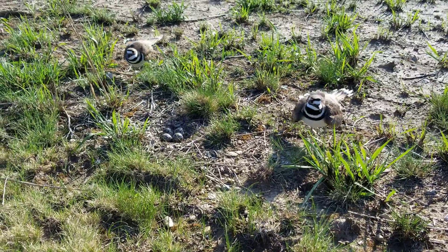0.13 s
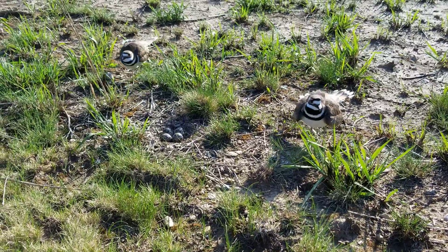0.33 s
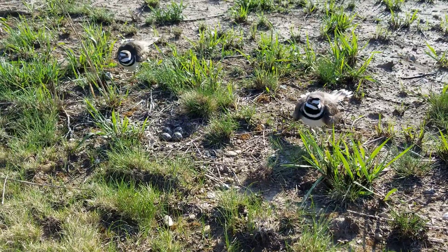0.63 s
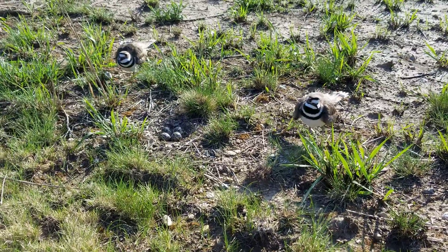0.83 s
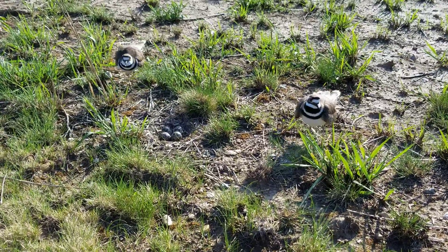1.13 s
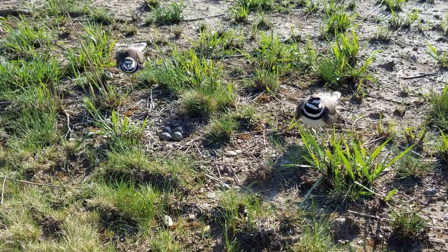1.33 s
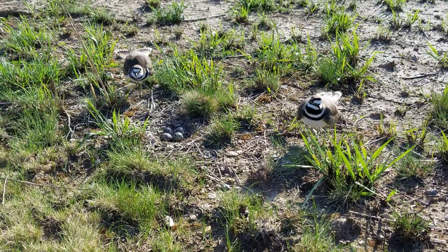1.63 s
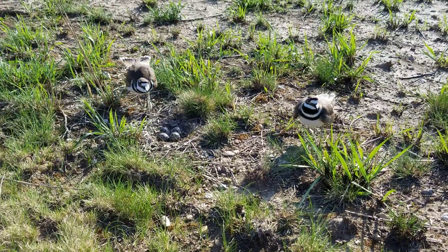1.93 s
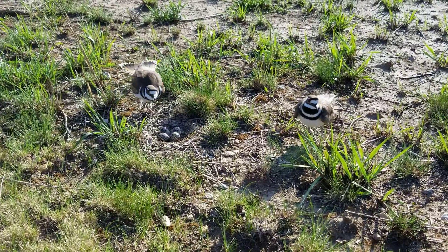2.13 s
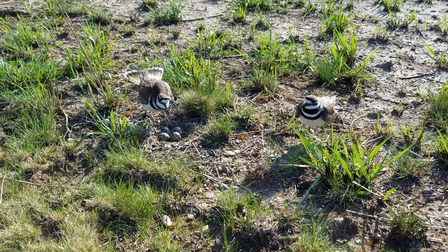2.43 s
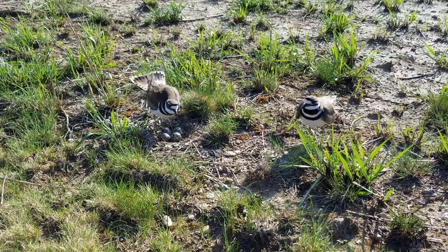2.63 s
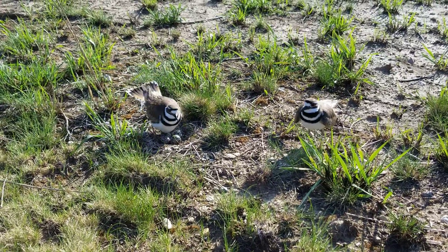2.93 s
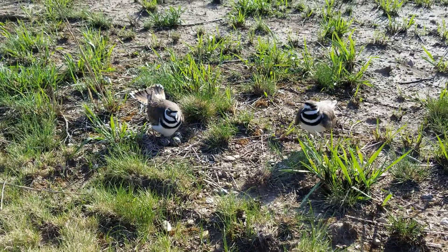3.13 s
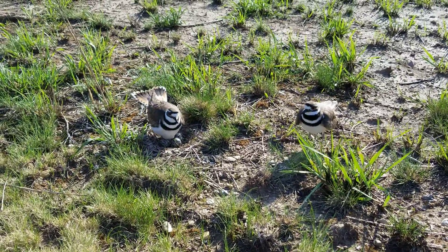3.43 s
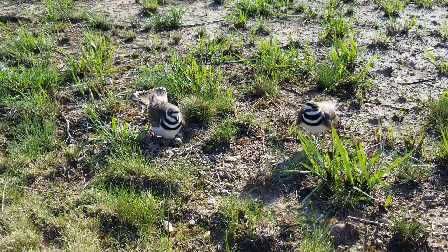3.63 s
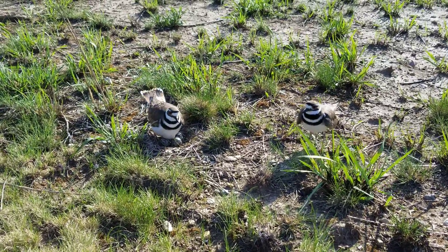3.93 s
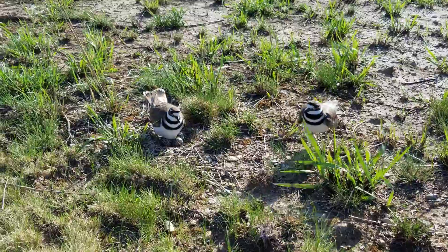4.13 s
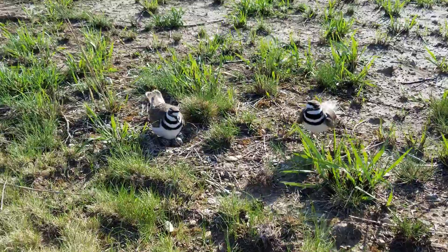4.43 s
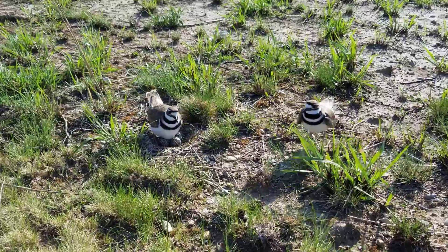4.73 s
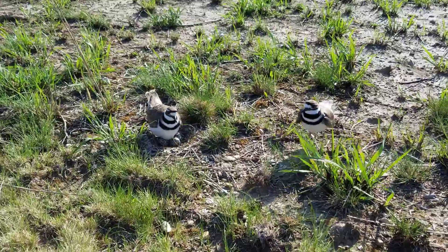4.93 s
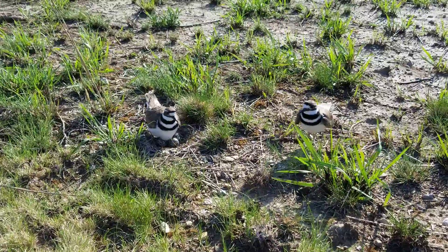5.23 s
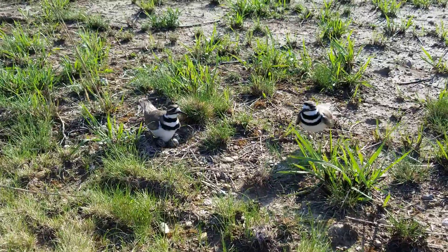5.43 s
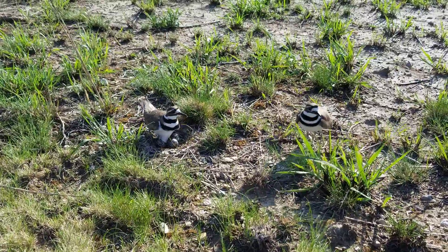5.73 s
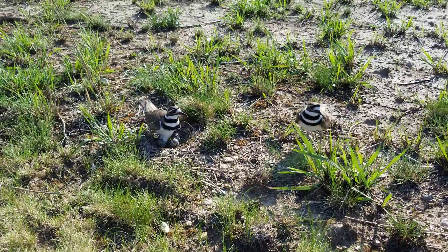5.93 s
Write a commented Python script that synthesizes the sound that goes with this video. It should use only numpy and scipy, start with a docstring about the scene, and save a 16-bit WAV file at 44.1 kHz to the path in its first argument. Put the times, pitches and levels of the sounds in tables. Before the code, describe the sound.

Two agitated plovers beside a ground nest give a loud, uneven run of short, shrill piping notes, followed by a drawn-out cry. Then wind rumbles, flutters and slaps at the microphone while two weaker calls and faint distant birds show through. A rising whine breaks into soft peeps that sink at the end. Open field, close dry birds, mostly in the left channel.

```python
"""Two killdeer scold beside their nest in an open field, over noise for field and chorus, in light wind.
First comes a run of shrill notes, each a gliding stack of partials; then three drawn-out calls on drawn curves.
From halfway, rumble, flutter and slaps of wind buffet the two microphone ports, while far birds slur and tick.
A rising whine then breaks into soft peeps. The right channel picks up airborne sound only weakly."""
import sys
import numpy as np
from scipy import signal
from scipy.fft import rfft, irfft, next_fast_len
from scipy.io import wavfile
from scipy.ndimage import uniform_filter1d, map_coordinates

SR = 44100
rng = np.random.default_rng(int(sys.argv[2]) if len(sys.argv) > 2 else 0)


def transcribe(signal):
    """Save signal, clipped to [-1, 1], as a 16-bit WAV file at the path in sys.argv[1]."""
    frames = np.atleast_2d(signal).T
    limited = np.clip(frames, -1, 1)
    pcm = np.round(limited * 32767).astype(np.int16)
    wavfile.write(sys.argv[1], SR, pcm)


N = 267598
TIME = np.arange(N) / SR

# Colour of small eddies in the wind. Each row: frequency in Hz, relative level in dB.
FLUTTER_COLOUR = [(40, -21), (140, 3), (240, 0), (330, -0.5), (520, -11.5), (800, -24), (1300, -38),
                  (2000, -51.5), (3500, -75.5), (6000, -120)]
# Throat colour common to all near calls. Each row: frequency in Hz, gain in dB.
THROAT_COLOUR = [(1600, 4), (1760, -14), (1950, -9), (2150, 0), (4500, -0.5), (5600, 12.5), (6400, -5.5),
                 (7100, -6), (7700, -6), (8300, 0.5), (9000, 3), (10000, -2.5), (12000, -5.5), (13500, 0),
                 (15400, 6), (16200, -11.5)]


def amp(db):
    """Decibels to gain."""
    return 10 ** (np.asarray(db) / 20)


def unit(x):
    """x at rms 1."""
    return x / np.sqrt(np.mean(x ** 2) + 1e-20)


def along(points, hz):
    """Rows of (Hz, value) read on a log frequency axis."""
    f, v = np.transpose(points)
    return np.interp(np.log(hz + 1), np.log(f + 1), v)


def glide(times, values, t):
    """Straight lines between the knots, with corners rounded and no overshoot."""
    knots = np.maximum.accumulate(times)
    return uniform_filter1d(np.interp(t, knots, values), size=180, mode="nearest")


def wobble(rate, n):
    """A smooth random curve of n samples, with rate knots a second."""
    knots = rng.standard_normal(int(n * rate / SR) + 4)
    return map_coordinates(knots, [np.arange(n) * rate / SR])


def filtered(x, response):
    """x times a response of frequency, padded so that its end does not wrap into its start."""
    m = next_fast_len(x.shape[-1] + 8192)
    spectrum = rfft(x, m) * response(np.fft.rfftfreq(m, 1 / SR))
    return irfft(spectrum, m)[..., :x.shape[-1]]


def coloured(x, colour):
    """x shaped by rows of (Hz, dB)."""
    return filtered(x, lambda hz: amp(along(colour, hz)))


def noise(colour):
    """Noise of rms 1 with the given colour."""
    return unit(coloured(rng.standard_normal(N), colour))


def add(track, s, sound):
    """Mix a sound into the track at time s in seconds."""
    at = round(s * SR) + np.arange(len(sound))
    inside = (at >= 0) & (at < N)
    track[at[inside]] += sound[inside]


def scatter(x, t60):
    """Diffuse answer of grass and bushes: decaying noise, cut at 1 s; t60 is the time in s to fall 60 dB."""
    t = np.arange(SR) / SR
    tail = rng.standard_normal(SR) * amp(-60 * t / t60) * (1 - np.exp(-t / 0.0047))
    return signal.fftconvolve(x, tail / np.linalg.norm(tail))[:N]


def open_field():
    """Steady noise of the field, with a hump near 1900 Hz for the distant chorus, at a slowly moving level."""
    # Colour of field and chorus. Each row: frequency in Hz, relative level in dB.
    field_colour = [(100, -2.5), (400, -7), (800, -11), (1400, -9.5), (1650, -11), (1880, -2),
                    (2050, -16.5), (2300, -22.5), (2900, -25.5), (3700, -19.5), (4400, -28), (7000, -36),
                    (11000, -31), (16000, -34)]
    # Course of their level. Each row: time in seconds, level in dB.
    field_level = [(0, -56.5), (1.7, -53.5), (2.6, -54), (6, -56.5)]
    return amp(np.interp(TIME, *np.transpose(field_level))) * noise(field_colour)


def tick_run(count=7):
    """A far bird's quick, even run of ticks, each a short burst of noise in a narrow band."""
    start_s, gap_s, tick_s, tick_hz, level_db = 3.095, .0326, .01, 3370, -48.5
    centres = start_s + gap_s * np.arange(count)
    bursts = np.exp(-(2 * (TIME - centres[:, None]) / tick_s) ** 2).sum(axis=0)
    band = [(0.82 * tick_hz, -45), (.93 * tick_hz, -8), (tick_hz, 0),
            (1.07 * tick_hz, -8), (1.4 * tick_hz, -45), (2 * tick_hz, -70)]
    return amp(level_db) * bursts * noise(band)


def far_birds(blur=0.019):
    """Thin slurs and ticks from across the field: gliding sines whose pitch is blurred at random."""
    # Far songbirds. Each row: start in seconds, length in seconds, start pitch in Hz, end pitch in Hz,
    # level in dB before a lift of 1 dB.
    slurs = [(3.245, 0.086, 2770, 2820, -67), (3.31, 0.11, 3165, 2930, -57.5),
             (3.447, 0.052, 3000, 3250, -60), (3.475, 0.062, 2786, 2595, -60.5),
             (3.857, 0.053, 2915, 3550, -59.5), (3.9, 0.083, 3080, 2832, -64),
             (4.363, 0.061, 2790, 3060, -57), (4.41, .08, 2600, 2375, -65),
             (4.857, 0.15, 2644, 2730, -61.5), (5.403, .08, 3000, 2960, -61)]
    song = np.zeros(N)
    for s, length, start_hz, end_hz, db in slurs:
        n = int(length * SR)
        pitch = np.linspace(start_hz, end_hz, n) * (1 + blur * wobble(400, n))
        tone = np.sin(2 * np.pi * np.cumsum(pitch) / SR)
        add(song, s, amp(db + 1.0) * np.sqrt(np.hanning(n)) * tone)
    return song + tick_run()


def gusts(points):
    """Wind level in dB at one port: its slow course and quick random swings, as air is never steady."""
    swing_db, knots_per_s = 0.63, 14
    return np.interp(TIME, *np.transpose(points)) + swing_db * wobble(knots_per_s, N)


def buffeting(level_db, flutter_db, lump_db=5.0, steep=0.73, rate=130):
    """Turbulence at one port: a lumpy rumble, and small eddies (rate a second) that grow faster than the flow."""
    # Colour of the rumble. Each row: frequency in Hz, relative level in dB.
    rumble_colour = [(20, -15), (45, -5.5), (80, 0), (120, -2), (180, -9), (300, -19.5), (500, -44.5),
                     (900, -54.5), (2000, -79.5), (4000, -120)]
    lumps = wobble(40, N)
    rumble = unit(noise(rumble_colour) * amp(lump_db * lumps))
    hits = rng.random(N) < rate / SR
    knocks = hits * rng.standard_normal(N) * amp(2.89 * lumps)
    flutter = unit(coloured(knocks, FLUTTER_COLOUR))
    flow_db = np.minimum(level_db + 14, 0)
    rumble_gain = amp(-2.5 - 0.17 * flow_db)
    flutter_gain = amp(flutter_db + steep * flow_db)
    return amp(level_db) * (rumble_gain * rumble + flutter_gain * flutter)


def eddies(width=0.00051, sharpening=0.072, life=0.0061):
    """Each strong eddy sucks at a port, rebounds and leaves a short flutter; narrow ones crackle."""
    # Slaps of wind. Each row: time in seconds, strength in dB, crackle in dB (more makes the slap
    # narrower and its flutter louder), port.
    slaps = [(.887, -23.5, -33, "left"), (1.802, -20, -30, "left"), (2.882, -8, -22, "left"),
             (3.13, -20, -27, "left"), (3.264, -9, -33, "left"), (3.332, -13.5, -29.5, "left"),
             (3.412, -10.5, -27, "right"), (3.487, -5.5, -34, "right"), (3.551, -13, -26.5, "right"),
             (3.609, -11.5, -11, "left"), (3.635, -9, -13, "left"), (3.663, -3.5, -16, "left"),
             (3.676, -14, -10.5, "left"), (3.865, -13, -26, "left"), (3.895, -13.5, -18, "left"),
             (3.974, -20, -17, "left"), (4.093, -3.5, -20, "left"), (4.224, -7.5, -18, "left"),
             (4.388, -16, -19.5, "left"), (4.415, -12.5, -25, "left"), (4.468, -21.5, -16, "left"),
             (4.704, -15.5, -35.5, "left"), (4.766, -6, -11.5, "left"), (5.0, -18.5, -45, "right"),
             (5.129, -16.5, -27.5, "left"), (5.176, -15, -18.5, "left"), (5.194, -21, -13.5, "left"),
             (5.262, -12.5, -31.5, "left"), (5.558, -5, -22, "left"), (5.57, -12.5, -12, "left"),
             (5.645, -13, -22.5, "left"), (5.705, -13, -25, "left"), (5.825, -16, -33, "right"),
             (5.907, -13, -25, "left"), (5.954, -16, -17, "left"), (5.964, -9, -15.5, "left"),
             (5.987, -12.5, -17.5, "left")]
    spill_db = -25.5  # share of an eddy that the other port feels
    ports = np.zeros((2, N))
    lead = .02  # seconds kept ahead of each eddy
    t = np.arange(SR // 10) / SR - lead
    wake = noise(FLUTTER_COLOUR)
    age = np.maximum(t, 0) / life
    for s, db, crackle_db, side in slaps:
        u = (t - .004) / (width * np.exp(-sharpening * (crackle_db + 17.0)))
        # a swell with a steep front at its centre
        slap = np.exp(-u * u / 3) * np.tanh(1.416 * u)
        flutter = np.roll(wake, -round(s * SR))[:len(t)] * age * np.exp(1 - age)
        flutter_gain = amp(-5.5 + 0.44 * (crackle_db + 16.5))
        eddy = amp(db) * (amp(4) * slap + flutter_gain * flutter)
        for port, name in zip(ports, ("left", "right")):
            share = 1 if name == side else amp(spill_db)
            add(port, s - lead, share * eddy)
    return ports


def wind():
    """Wind on both ports: the strongest gusts overload them softly, and only the low part passes."""
    # Course of the wind at each port. Each row: time in seconds, flow level in dB.
    left_course = [(0, -49.5), (.89, -40), (1.02, -49.5), (1.5, -38), (2.25, -39), (2.8, -49),
                   (2.89, -25.5), (2.97, -43.5), (3.3, -29), (3.47, -37), (3.63, -12), (3.72, -23),
                   (3.92, -18.5), (4.04, -29), (4.14, -19.5), (4.49, -24), (4.55, -55), (4.82, -21.5),
                   (4.9, -36.5), (5.12, -36.5), (5.2, -22.5), (5.35, -37.5), (5.48, -34), (5.56, -19),
                   (5.74, -25.5), (5.84, -39), (5.94, -19.5), (6.06, -32)]
    right_course = [(0, -50.5), (3.15, -47.5), (3.33, -39), (3.42, -17), (3.53, -12.5), (3.85, -40.5),
                    (3.99, -27.5), (4.16, -31.5), (4.26, -49.5), (4.71, -44), (4.92, -50.5), (5.01, -19.5),
                    (5.1, -49), (5.36, -43), (5.48, -27), (6.06, -44.5)]
    # What the ports pass of the turbulence. Each row: frequency in Hz, gain in dB.
    port_colour = [(1000, 1), (1700, -4.5), (2400, -12.5), (3500, -29), (6000, -69.5)]
    ceiling = .88  # amplitude where the overload flattens out
    left = buffeting(gusts(left_course), flutter_db=-0.5)
    right = buffeting(gusts(right_course), flutter_db=-12.5)
    pressure = np.array([left, right]) + eddies()
    return coloured(ceiling * np.tanh(pressure / ceiling), port_colour)


def syrinx(pitch, level_db, partials, shrill_db=0, flicker_db=3.0, rasp=0.036, settle=0.0075):
    """One call: a harmonic stack that starts with a brief rasp and settles into a clean whistle."""
    waver, shimmer_db = .0015, .22  # random share of the pitch, random swing of the level
    n = len(pitch)
    t = np.arange(n) / SR
    phase = 2 * np.pi * np.cumsum(pitch * (1 + waver * wobble(130, n))) / SR
    phase = phase + rasp * np.exp(-t / settle) * wobble(1800, n)
    # a tighter membrane gives a higher pitch and stronger side partials
    tension_db = 45 * np.log(pitch / np.median(pitch))
    tone = np.zeros(n)
    for k, db in enumerate(partials, 1):
        partial_db = db + (k > 2) * shrill_db
        if k != 2:  # the second partial carries the sound and stays steady
            partial_db = partial_db + tension_db + flicker_db * wobble(47, n)
        tone += amp(partial_db) * np.sin(k * phase)
    edges = np.clip(np.minimum(t, t[-1] - t) / 0.002, 0, 1)
    return np.sqrt(2) * tone * edges * amp(level_db + shimmer_db * wobble(90, n))


def arched_note(length, pitch_hz, leap_hz, slide_hz, level_db, partials, shrill_db, drop_hz, fall_s,
                onset_db, fade_db, rasp, catch=0, leap_rate=11000):
    """The pitch leaps up (leap_rate Hz a second), slides in a bow, then drops as the air pressure fails."""
    # The shorter a note, the rounder its bow in pitch. Each row: note length in seconds, bow in Hz.
    bow_by_length = [(.03, 36), (.06, 30.5), (.09, 15), (.13, 9.8)]
    droop_db = 2  # strength lost while a note is held
    t = np.arange(int(length * SR)) / SR
    crest = min(leap_hz / leap_rate, .35 * length)
    late = length - min(fall_s, .3 * length)
    rise = np.clip(1 - t / crest, 0, 1) ** 1.71
    hold = np.clip((t - crest) / (late - crest), 0, 1) - .5
    fall = np.clip((t - late) / (length - late), 0, 1)
    bow = np.interp(length, *np.transpose(bow_by_length)) * (2 * hold) ** 2
    pitch = pitch_hz - leap_hz * rise + slide_hz * hold - bow - drop_hz * fall ** 0.97
    envelope_db = level_db + onset_db * rise - droop_db * hold + fade_db * fall ** 2
    # where catch is set, the voice catches for an instant before its last flick
    catch_s = length - .01 + 0.00081 * rng.standard_normal()
    gap = 1 - min(catch, 1) * np.exp(-((t - catch_s) / 0.0017) ** 2)
    # the overtones fade first
    return gap * syrinx(pitch, envelope_db, partials, shrill_db - 4 * fall ** 2, rasp=rasp)


def long_call(rows, partials):
    """A drawn-out call that follows its own curve of pitch and level."""
    s, hz, db = np.transpose(rows)
    t = np.arange(s[0], s[-1], 1 / SR)
    return syrinx(glide(s, hz, t), glide(s, db, t), partials, rasp=0.11, settle=0.0023)


def peeping():
    """A rising whine that breaks into soft peeps, which sink in pitch towards the end."""
    # The whine. Each row: time in seconds, fundamental in Hz, level in dB before the throat colour.
    whine = [(5.055, 1988, -59), (5.09, 2270, -49), (5.118, 2350, -44.5), (5.137, 2256, -44),
             (5.187, 2474, -36), (5.203, 2387, -39.5), (5.216, 2161, -41)]
    # Soft peeps. Each row: start in seconds, length in seconds, fundamental in Hz, slide while held in Hz,
    # level in dB before the throat colour.
    peeps = [(5.251, 0.028, 2416, -20, -34.5), (5.329, .04, 2370, -18, -40.5), (5.414, .04, 2350, 7.5, -40),
             (5.496, .042, 2360, 28, -37.5), (5.591, 0.047, 2350, 70.5, -39),
             (5.7, 0.089, 2245, 135.5, -39.5), (5.868, 0.06, 2115, 134.5, -45)]
    # Partials 1, 2, 3 .. of whine and peeps, in dB.
    peep_partials = [-22, -1.5, -22.5, -23.5, -24.5, -33, -44.5, -45.5]
    voice = np.zeros(N)
    add(voice, whine[0][0], long_call(whine, peep_partials))
    for s, length, hz, slide_hz, db in peeps:
        add(voice, s, arched_note(length, hz, leap_hz=165, slide_hz=slide_hz, level_db=db,
                                  partials=peep_partials, shrill_db=-0.5, drop_hz=160, fall_s=.016,
                                  onset_db=-5.5, fade_db=-27, rasp=0.0088))
    return coloured(voice, THROAT_COLOUR)


def killdeer():
    """The loud calls of the pair: the run of arched alarm notes and the drawn-out calls."""
    # Alarm notes, overlapping where both birds call. Each row: start in seconds, length in seconds,
    # fundamental in Hz, opening leap in Hz, slide while held in Hz, level in dB before the throat colour,
    # shrillness in dB (lift of the partials above the second).
    alarm_notes = [(-0.04, .092, 2131, 160, -70.5, -14, 3), (0.027, 0.067, 2028, 248.7, 28, -14, -7),
                   (.108, 0.095, 2163, 179.5, -110, -12.5, 1.5), (.179, 0.087, 2012, 284.9, 14, -15, -3),
                   (0.262, .055, 2036, 110, -130, -14.5, -2.5), (.373, 0.072, 2146, 180.3, -51, -12.5, 0),
                   (0.505, .13, 2208, 190, -54.5, -12.5, 2), (.701, 0.057, 2100, 160, -89.5, -14.5, -0.5),
                   (0.817, .089, 2067, 189.7, -60, -16, 0), (.968, 0.077, 1987, 170, -85, -18, 0.5),
                   (1.107, 0.094, 2050, 195, -21.5, -16, .5), (1.262, 0.1, 2132, 185, -71.5, -11.5, -0.5),
                   (1.363, 0.075, 1890, 140, -59.5, -15.5, -7), (1.437, .12, 2185, 190, -45, -10, 2),
                   (1.626, 0.091, 2089, 170.4, -155, -12, 2), (1.781, 0.057, 1953, 90, -40, -13.5, -2),
                   (1.906, 0.083, 1969, 120.3, 16.5, -12.5, -1.5), (2.049, .12, 2054, 174.4, -12, -16, 7),
                   (2.233, 0.079, 2055, 201, -70.5, -15, 6), (2.369, 0.072, 2005, 160, -130, -14, 1.5)]
    # Partials 1, 2, 3 .. of the alarm notes, in dB.
    alarm_partials = [-27, 1, -34, -24.5, -30.5, -31, -23, -34]
    # Drawn-out calls, one curve each. Each row of a curve: time in seconds, fundamental in Hz,
    # level in dB before the throat colour.
    wails = [
        [(2.886, 1884, -17), (2.908, 2010, -8.5), (2.932, 1836, -13.5), (2.955, 1737, -19), (2.98, 1761, -16),
         (3.01, 1816, -13), (3.053, 1877, -11.5), (3.08, 2146, -23.5), (3.094, 2030, -51)],
        [(3.393, 1693, -34.5), (3.401, 1636, -23.5), (3.43, 1627, -25), (3.443, 1517, -46)],
        [(4.248, 1727, -29), (4.267, 1886, -26), (4.31, 1775, -26), (4.368, 1854, -29), (4.39, 1834, -55)],
    ]
    # Partials 1, 2, 3 .. of each drawn-out call, one row a call, in dB.
    wail_partials = [
        [-25.5, 0.016, -42, -44.5, -47, -45.5, -36.5, -46.5],
        [-29, 0.0033, -30.5, -43, -41, -42, -56, -57],
        [-21.5, 0.0022, -43.5, -27, -23.5, -44, -50, -60],
    ]
    voice = np.zeros(N)
    for s, length, hz, leap_hz, slide_hz, db, shrill_db in alarm_notes:
        add(voice, s, arched_note(length, hz, leap_hz, slide_hz, db, alarm_partials, shrill_db,
                                  drop_hz=130.9, fall_s=0.017, onset_db=-6.0, fade_db=-16,
                                  rasp=0.036, catch=0.38))
    for curve, partials in zip(wails, wail_partials):
        add(voice, curve[0][0], long_call(curve, partials))
    # the first drawn-out call begins hoarsely, before the tone catches
    hoarse_db = np.interp(TIME, [2.84, 2.857, 2.888, 2.9], [-120, -48.5, -47.5, -120])
    breath = noise([(2000, -36.0), (3200, 0.5), (3900, -0.5), (5000, -12.5), (6500, -33.0), (16000, -40.5)])
    return coloured(voice + amp(hoarse_db) * breath, THROAT_COLOUR)


def scene():
    """Birds and field reach mostly the left channel; the wind hits each port, with a little spill."""
    calls, peeps, far = killdeer(), peeping(), far_birds()
    near = calls + peeps
    # a close reflection, 5.4 ms late, beats against the gliding pitch
    near = near + amp(-16.5) * filtered(near, lambda hz: np.exp(-2j * np.pi * hz * 0.0054))
    # the long echo of the field takes more of the soft peeps than of the loud calls
    echo = scatter(amp(-52) * calls + amp(-25) * peeps, t60=1.6)
    air = near + amp(-24) * scatter(near, t60=0.044) + echo
    air = air + far + amp(-5) * scatter(far, t60=0.4)
    air = air + open_field()
    right_hiss = amp(-63) * noise([(100, -0.5), (500, -16.0), (1500, -27.5), (4000, -30), (16000, -36.0)])
    return wind() + np.array([air, amp(-26.5) * air + right_hiss])


def record(dry):
    """The recorder keeps nothing above its band limit."""
    top_hz = 16400
    return filtered(dry, lambda hz: hz < top_hz)


dry = scene()
out = record(dry)
transcribe(out)
```